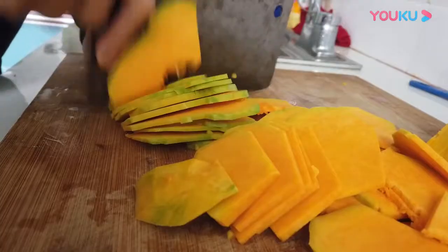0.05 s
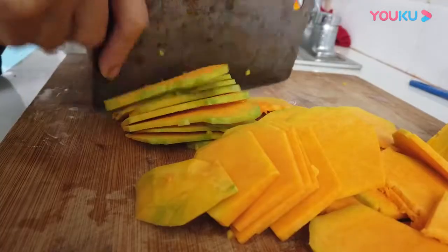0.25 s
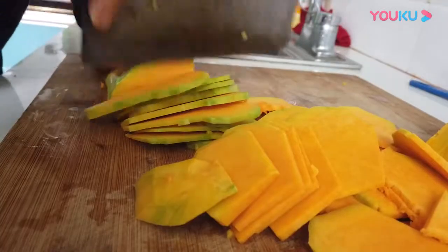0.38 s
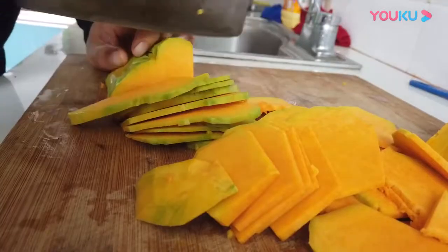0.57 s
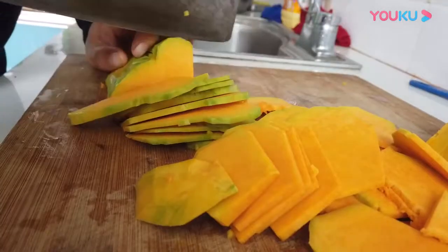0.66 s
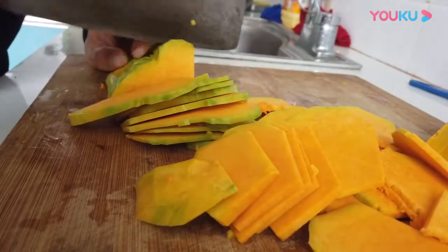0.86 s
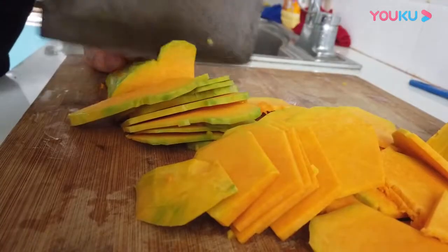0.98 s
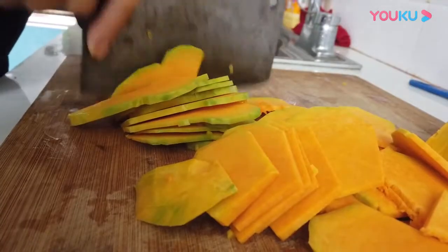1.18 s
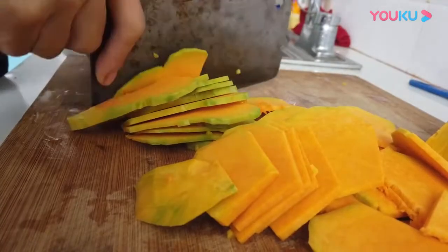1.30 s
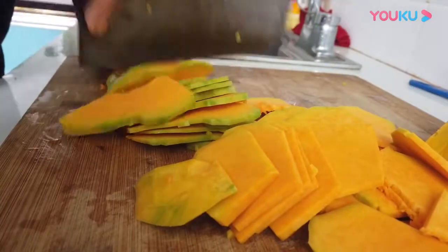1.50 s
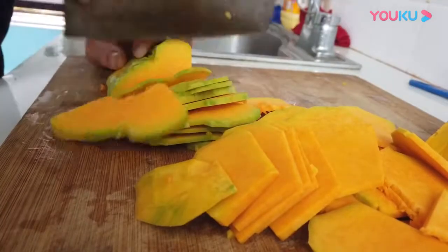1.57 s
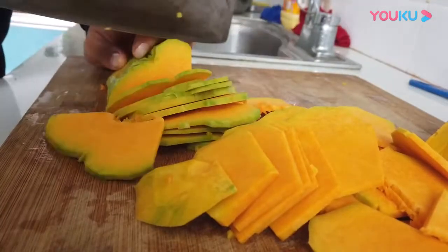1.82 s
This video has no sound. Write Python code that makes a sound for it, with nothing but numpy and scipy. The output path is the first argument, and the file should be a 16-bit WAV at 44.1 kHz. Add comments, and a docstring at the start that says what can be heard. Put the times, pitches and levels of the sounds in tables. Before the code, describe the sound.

Two sharp, woody cleaver chops about a second apart, each led by a wet, crisp slicing hiss, with faint scuffs between them, heard close up in stereo in a hard-walled, reverberant kitchen.

```python
"""Chopping a pumpkin

A heavy cleaver takes two slices off a pumpkin on a thick wooden board in a tiled kitchen.
Each time the blade hisses through the flesh (coloured noise), tears the rind (short noise bursts)
and slams into the board (decaying tones and a crack). The bare room rings on, made by convolution.
Between the cuts the blade ticks faintly as it is set on the pumpkin again; a quiet noise floor stays."""
import sys
import numpy as np
from scipy import signal
from scipy.fft import rfft, irfft
from scipy.io import wavfile
from scipy.ndimage import uniform_filter1d

SR = 44100
rng = np.random.default_rng(int(sys.argv[2]) if len(sys.argv) > 2 else 0)


def int16_out(signal):
    """Quantize to a 16-bit WAV file."""
    q = np.round(np.clip(np.atleast_2d(signal).T, -1, 1) * 32767)
    wavfile.write(sys.argv[1], SR, q.astype(np.int16))


N = 81585
T = np.arange(N) / SR  # time in seconds
FREQS = np.fft.rfftfreq(2 * N, 1 / SR)  # frequencies in Hz

# The blade meets the board. Each row: start in seconds, relative level of the ringing in dB,
# contact time in ms, relative level of the crack in dB.
CHOPS = [(0.2028, 4.5, 0.45, -8), (1.3334, 1.5, 0.14, -11)]
# How wide the room and the hiss sound. Each row: frequency in Hz, side against mid in dB.
SIDE_COLOUR = [(100, -20), (300, -25), (650, -24), (1000, -14), (1450, -4), (2300, 3), (4000, 0),
               (12000, -1)]
# Sound that the broad blade throws to the side. Each row: frequency in Hz, gain in dB.
BOUNCE_COLOUR = [(100, -9), (400, -12), (620, -20), (1000, -11), (1500, -5), (2400, 0), (8000, -2)]


def undb(db):
    """Decibels to gain."""
    return 10 ** (np.asarray(db) / 20)


def along(points, hz):
    """Read (Hz, value) points on a log-frequency axis."""
    p = np.array(points, float)
    return np.interp(np.log(np.maximum(hz, 1)), np.log(p[:, 0]), p[:, 1])


def colour(x, points):
    """Filter with the given (Hz, dB) response that never sounds ahead of its input."""
    cepstrum = irfft(along(points, FREQS) * np.log(10) / 20)
    # folding the cepstrum onto positive times gives the minimum-phase filter
    cepstrum[1:N] *= 2
    cepstrum[N + 1:] = 0
    response = np.exp(rfft(cepstrum))
    return irfft(rfft(x, 2 * N) * response)[..., :N]


def unit(x):
    """Scale to rms 1."""
    return x / np.sqrt(np.mean(x ** 2))


def stereo(mid, side):
    """Left and right from mid and side."""
    return np.array([mid + side, mid - side])


def noise(points, side_db):
    """Coloured stereo noise of rms 1."""
    mid, side = colour(rng.standard_normal((2, N)), points)
    return unit(stereo(mid, undb(side_db) * side))


def ring(hz, db, t60, t):
    """One decaying mode, struck at t = 0; it falls by 60 dB in t60 seconds."""
    t = np.maximum(t, 0)
    return undb(db) * np.sin(2 * np.pi * hz * t) * np.exp(-np.log(1000) * t / t60)


def bursts(events, rise_s, decay_s):
    """Loudness curve of a row of short swells, one for each (s, dB)."""
    level = 0
    for start, db in events:
        t = np.maximum(T - start, 0)
        level = level + undb(db) * (1 - np.exp(-t / rise_s)) * np.exp(-t / decay_s)
    return level


def walk(rate):
    """Random levels, rate of them a second, joined by straight lines; the points spread by 1."""
    return np.interp(T * rate, np.arange(1024), rng.standard_normal(1024))


def quiet_floor():
    """Steady coloured noise that lies under everything."""
    # Each row: frequency in Hz, relative level in dB.
    floor_colour = [(25, -3.5), (55, -6), (100, -8), (200, -17), (400, -16.5), (640, -11.5), (1200, -26),
                    (3000, -34), (7000, -40), (9500, -38.5), (10800, -31), (12500, -39.5), (15500, -53)]
    return undb(-66.5) * noise(floor_colour, side_db=-7)


def diffuse_tail():
    """Dense noise echo in octave bands, each dying away at its own speed."""
    # Each row: frequency in Hz, time to decay by 60 dB in seconds.
    decay_times = [(100, 0.91), (260, 0.7142), (700, 0.8059), (1300, 0.6869), (2500, 0.9), (5000, 0.42),
                   (11000, 0.72)]
    even_s = 0.04  # averaging time for levelling the noise
    centres = 50 * 2 ** np.arange(9.)
    spectra = rfft(rng.standard_normal((2, N)), 2 * N)
    tail = 0
    for hz, pick in zip(centres, np.eye(len(centres))):
        band = irfft(spectra * along(np.c_[centres, pick], FREQS))[:, :N]
        power = uniform_filter1d(band ** 2, int(even_s * SR), axis=1)
        band = band * np.sqrt(power.mean() / power)  # a diffuse field dies away evenly
        tail = tail + band * np.exp(-np.log(1000) * T / along(decay_times, hz))
    return tail


def kitchen(x):
    """Early echoes, standing waves and a dense tail that is wide in the treble."""
    # Colour of the tail. Each row: frequency in Hz, relative level in dB.
    tail_colour = [(40, -13.5), (85, -2), (125, 7), (180, 5.5), (260, -6.5), (420, 6), (600, -7.5),
                   (790, 8.5), (1050, 0.5), (1300, -2.5), (1700, -9.5), (2200, 4.5), (3100, 2.5),
                   (4300, -7), (6000, -2), (11000, -6.5)]
    # Standing waves. Each row: frequency in Hz, relative level in dB, 60 dB decay time in seconds.
    standing_waves = [(108, -66, .9), (155, -60, .8), (193, -58, .9), (368, -61, .7), (578, -56, .65),
                      (659, -60, .65), (731, -58, .7), (784, -54, .65), (846, -56, .65), (942, -54, .72),
                      (1024, -59, .7), (1052, -60, .75), (1112, -59, .7), (1617, -59, .7)]
    # Echoes off worktop, wall and ceiling. Each row: delay in seconds, relative level in dB.
    reflections = [(.0145, -14), (.028, -14), (.039, -8)]
    gap_s, build_s = 0.006265, 0.009  # silence before the tail, then its build-up time
    early_db, early_s = 2, 0.16  # the first reflections are stronger than the late tail

    tail = diffuse_tail()
    build = 1 - np.exp(-np.maximum(T - gap_s, 0) / build_s)
    early = undb(early_db * np.exp(-(T / early_s) ** 2))
    mid, side = colour(unit(tail * build) * early / np.sqrt(N), tail_colour)
    response = stereo(mid, colour(side, SIDE_COLOUR))
    for hz, db, t60 in standing_waves:
        response += build * ring(hz, db, t60, T - gap_s)
    echoes = np.zeros(N)
    for delay, db in reflections:
        echoes[int(delay * SR)] += undb(db)
    # the echoes are dull: (Hz, dB)
    response += colour(echoes, [(200, -0.5), (800, 0), (1500, -12), (4000, -22.5)])
    return signal.fftconvolve(x, response, axes=1)[:, :N]


def ticks():
    """Faint, short scuffs of steel on pumpkin: swells of coloured noise."""
    # Light touches of the blade. Each row: start in seconds, relative level in dB.
    touches = [(.648, -64), (.68, -73.5), (.812, -79.5), (.92, -75.5)]
    # Each row: frequency in Hz, relative level in dB.
    tick_colour = [(500, -20), (2200, -8), (2850, 5.5), (3200, 2), (3800, -5), (4800, 0), (5600, -4),
                   (7500, -25), (9500, -7), (11000, -6), (14000, -44)]
    return bursts(touches, rise_s=0.0039, decay_s=0.027) * noise(tick_colour, side_db=-2)


def flesh_hiss():
    """Cells burst at random along the blade, which catches and slips in the flesh."""
    # Each row: frequency in Hz, relative level in dB.
    hiss_colour = [(300, -1.5), (500, -5), (640, 16.5), (800, -3), (1400, 3), (1900, 6), (2200, 0),
                   (2600, 7), (3200, -4.5), (3900, 3.5), (5000, -4.5), (9000, -1), (10900, 5.5),
                   (13000, -3.5), (15500, -5.5)]
    cells_per_s, cell_spread_db = 7000, -0.5
    scrape_db, scrape_per_s = 1, 63  # size and speed of the catching and slipping
    cells = (rng.random((2, N)) < cells_per_s / SR) * rng.standard_normal((2, N))
    cells = cells * undb(cell_spread_db * rng.exponential(size=(2, N)))
    mid, side = colour(cells, hiss_colour)
    # the low rubbing and tearing noises are drawn elsewhere; this is the fine hiss alone
    hiss = unit(stereo(mid, colour(side, SIDE_COLOUR)))
    return hiss * undb(scrape_db * walk(scrape_per_s))


def rind_tears():
    """The rind tears in short noise bursts just before the blade lands."""
    # Each row: start in seconds, relative level in dB.
    tears = [(.172, -35.5), (.189, -25.5), (1.303, -39), (1.320, -27)]
    # Each row: frequency in Hz, relative level in dB.
    rind_colour = [(200, -22), (500, -17), (700, 1), (950, -0.5), (1500, 1.5), (2100, -22.5), (4000, -28),
                   (12000, -39)]
    return noise(rind_colour, side_db=-2.5) * bursts(tears, rise_s=0.003, decay_s=0.012)


def cutting():
    """Cells burst in a fine hiss along the blade, the flesh rubs low, and the rind tears last."""
    # The cut before each chop, one list per chop. Each row: time in seconds,
    # relative level of the hiss in dB, relative level of the low rubbing in dB.
    cuts = [
        [(0, -59, -51.5), (.06, -56.5, -52), (.13, -56.5, -67), (.17, -50.5, -51.5), (.195, -59.5, -50)],
        [(.97, -76, -66), (1.04, -68.5, -62.5), (1.125, -59, -51.5), (1.19, -65, -72.5), (1.26, -63, -67),
         (1.3, -56, -52), (1.325, -52, -59)],
    ]
    # Each row: frequency in Hz, relative level in dB.
    rub_colour = [(50, -17), (95, -5), (125, -13), (182, 0.5), (240, -6), (315, -2), (390, -5.5),
                  (480, -23.5), (900, -39.5)]
    hiss_trim_db, rub_trim_db, release_s = 5.5, -4, 0.018
    hiss = flesh_hiss()
    rub = noise(rub_colour, side_db=-22)
    out = rind_tears()
    for cut, chop in zip(cuts, CHOPS):
        times, hiss_db, rub_db = np.array(cut).T
        # full level from the first row to the chop, fading away on both sides
        outside = np.maximum(T - chop[0], 0) + np.maximum(times[0] - T, 0)
        gate = np.exp(-outside / release_s)
        hiss_level = undb(hiss_trim_db + np.interp(T, times, hiss_db))
        rub_level = undb(rub_trim_db + np.interp(T, times, rub_db))
        out += gate * (hiss * hiss_level + rub * rub_level)
    return out


def crack(t):
    """A burst of splintering wood fibres, even across the spectrum before it is coloured."""
    # Each row: frequency in Hz, relative level in dB.
    crack_colour = [(60, -3.5), (400, -6), (2000, -0.5), (3000, 6.5), (4200, 5), (5500, -4), (8500, -5),
                    (12000, -12.5), (15500, -21.5)]
    decay_s = 0.0016  # of the noise before its spectrum is evened out
    spectrum = rfft(rng.standard_normal((2, N)) * (t > 0) * np.exp(-t / decay_s))
    even = irfft(spectrum / (np.abs(spectrum) + 1e-12), N)
    mid, side = colour(even, crack_colour)
    return stereo(mid, colour(side, BOUNCE_COLOUR))


def chops():
    """A short push rings board and blade; the edge cracks as it bites the wood."""
    # The blade speaks at once, the heavy board swells. Each row: frequency in Hz,
    # relative level in dB, 60 dB decay time in seconds, rise time in seconds.
    board_modes = [(216, -20, 0.023, 0.0031), (619.7, -9.5, 0.071, 0.0016), (669, -1.5, 0.026, 0.0022),
                   (1072, -6, .016, 0.00038), (1236, -3.5, .012, 0.00045), (1436, -0.5, 0.0094, 0.00029),
                   (1656, -10.5, .016, 0.0015), (2980, -21, .012, 0.0015)]
    # The board gives off little bass. Each row: frequency in Hz, gain in dB.
    radiation = [(40, -8.5), (150, -11), (260, 8.5), (400, -10.5), (520, 0), (1750, 0), (2200, -8.5),
                 (4000, 0)]
    bounce_s = 0.00048  # a bounce off the broad blade arrives this late, from the side
    out = np.zeros((2, N))
    for start, db, contact_ms, crack_db in CHOPS:
        t = np.maximum(T - start, 0)
        body = 0
        for hz, mode_db, t60, rise in board_modes:
            body = body + ring(hz, mode_db, t60, t) * (1 - np.exp(-t / rise))
        # the push is half a sine wave; a longer contact softens the treble
        push = np.sin(np.pi * np.minimum(T[:128] * 1000 / contact_ms, 1))
        body = undb(db) * signal.lfilter(push / push.sum(), 1, colour(body, radiation))
        bounce = colour(np.interp(T - bounce_s, T, body), BOUNCE_COLOUR)
        out += stereo(body, bounce) + undb(crack_db) * crack(t)
    return out


def scene():
    """Knife work in the room, over a quiet floor."""
    blows = chops() + ticks()
    cut = cutting()
    to_room = blows + undb(-2.5) * cut  # the cut excites the room a little less
    echo = kitchen(np.mean(to_room, axis=0, keepdims=True))
    return blows + cut + echo + quiet_floor()


def record(dry):
    """Clip whatever exceeds full scale, then cut the top of the treble steeply."""
    top_hz = 15600
    low_pass = signal.ellip(10, .1, 80, top_hz, fs=SR, output="sos")
    return signal.sosfilt(low_pass, np.clip(dry, -1, 1))


dry = scene()
out = record(dry)
int16_out(out)
```